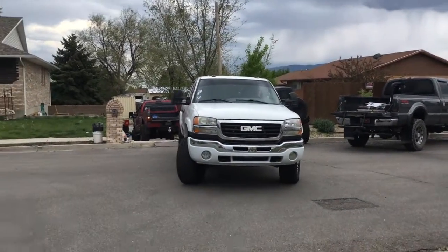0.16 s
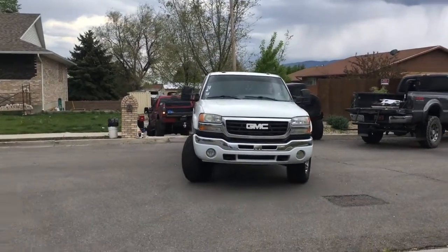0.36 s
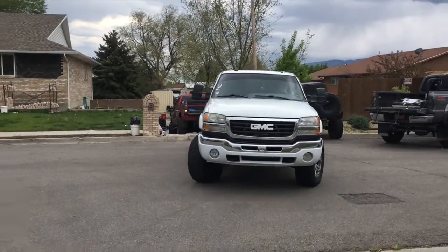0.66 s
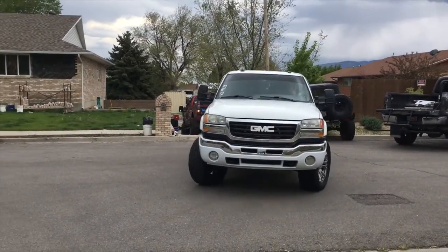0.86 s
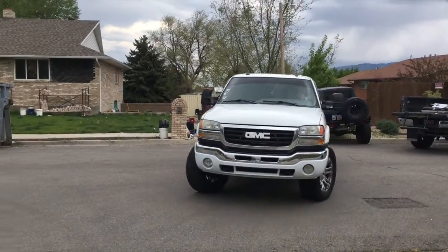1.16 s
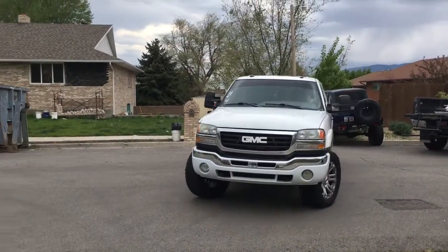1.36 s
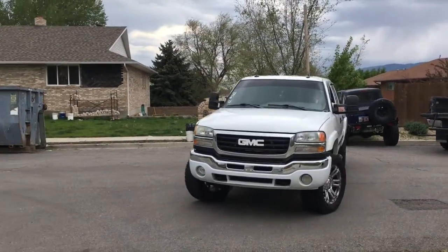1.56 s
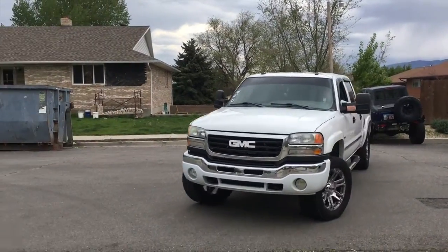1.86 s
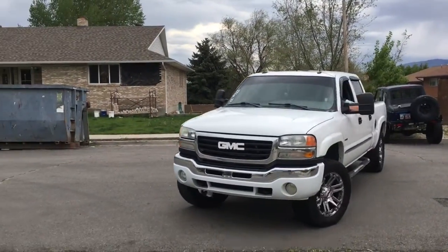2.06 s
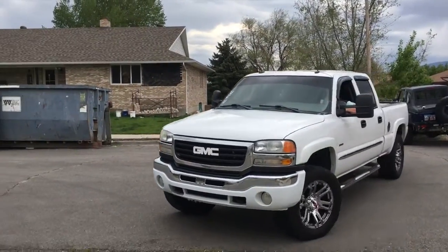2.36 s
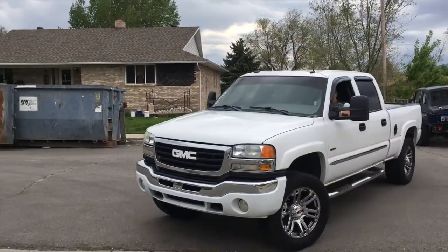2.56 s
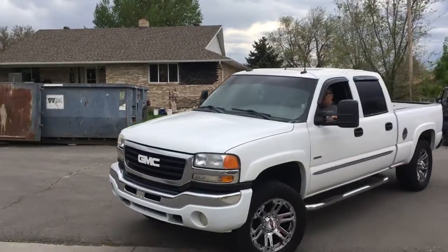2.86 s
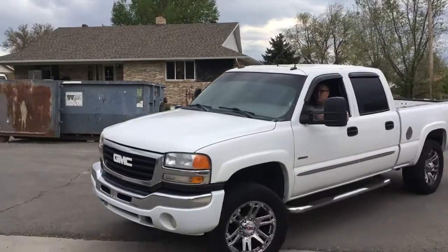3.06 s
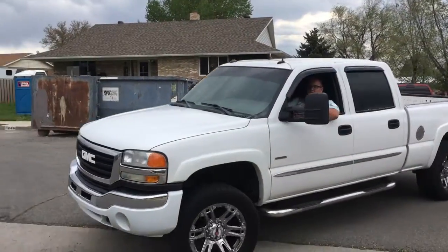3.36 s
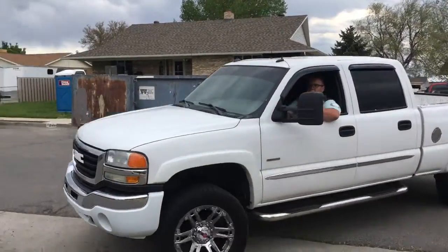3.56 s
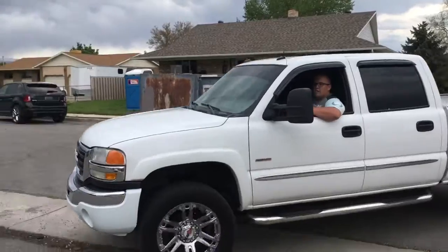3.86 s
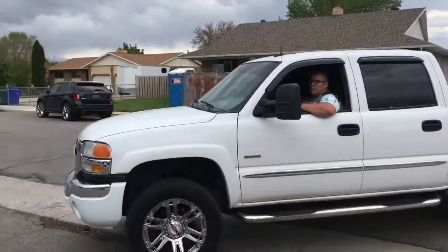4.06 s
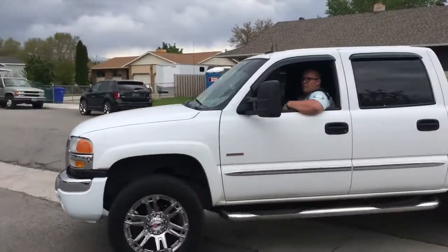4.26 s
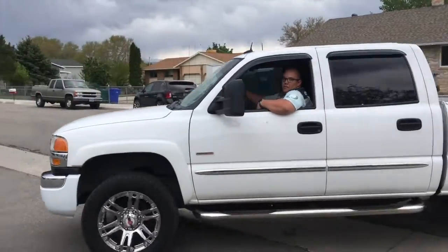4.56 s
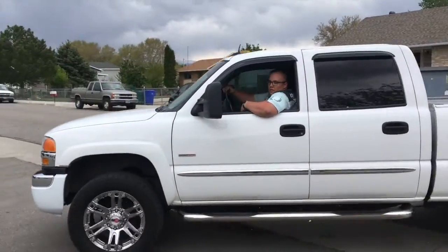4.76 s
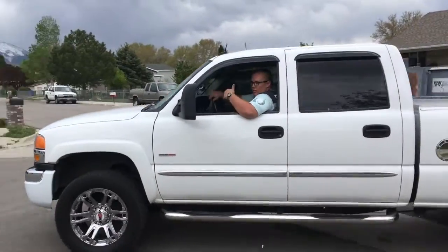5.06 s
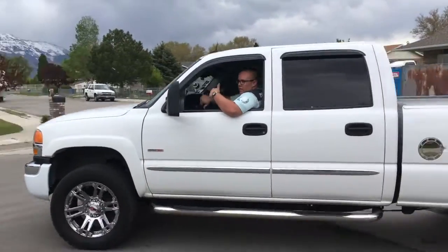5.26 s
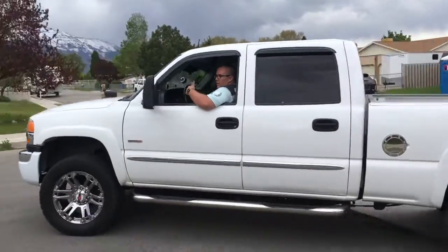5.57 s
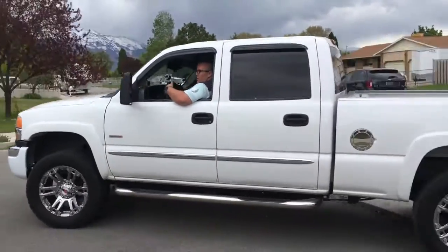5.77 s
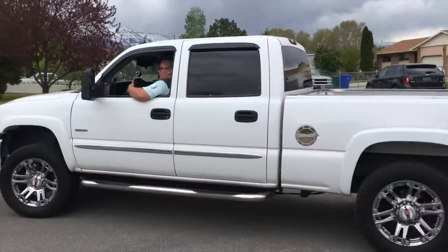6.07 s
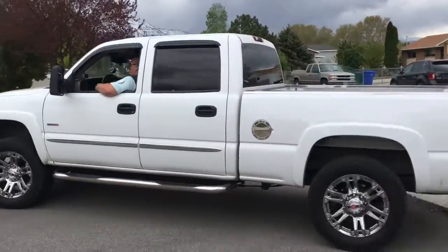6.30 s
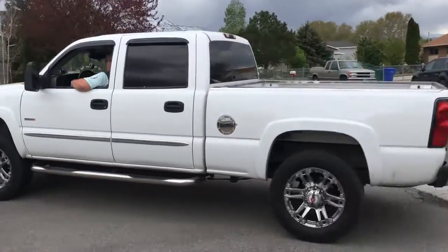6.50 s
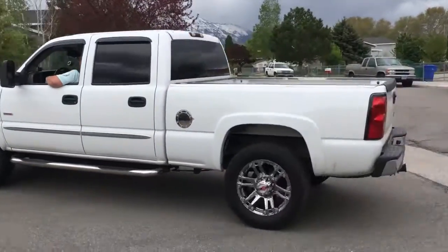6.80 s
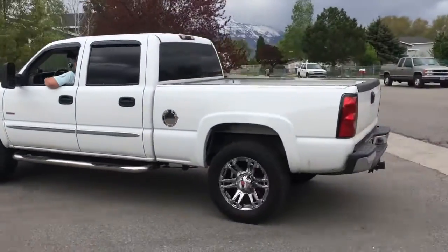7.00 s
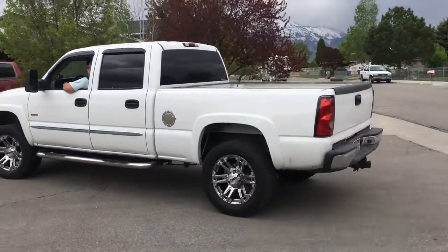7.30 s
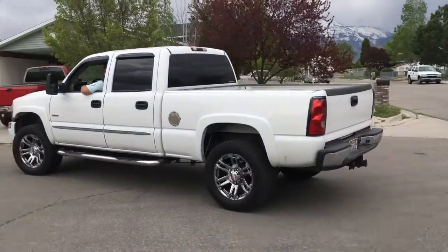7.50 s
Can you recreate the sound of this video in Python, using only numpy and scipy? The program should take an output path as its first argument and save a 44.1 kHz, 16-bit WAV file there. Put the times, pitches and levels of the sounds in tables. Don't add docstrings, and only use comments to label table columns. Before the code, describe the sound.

An open-air street, heard through a handheld microphone without wind protection. From 0 to 3 seconds, low rumbling wind and brief fluttery puffs dominate, with a cluster of rips around 1.4 to 1.9 and a heavy thump at 2.3. Beneath, a diesel pickup idles slowly closer with a quick, grainy clatter and thin hiss; faint grit ticks under its tyres. Between 3.2 and 3.8 the wind slams hardest. At about 4.1 the exhaust surges in a low boom, eases, then climbs in pitch and loudness as the truck pulls past. A dull, loud knock with a bright click lands at 4.76, a sharp stone snap at 5.5, and a smaller one at 6.1. The clatter is strongest around 5.7 to 6.5. From 6 to 7.6 the deep, throbbing exhaust drone stays full and loud, with wind still puffing, and the sound ends while it continues.

```python
import sys
import numpy as np
from scipy import signal
from scipy.fft import rfft, irfft, next_fast_len
from scipy.io import wavfile
from scipy.ndimage import uniform_filter1d, map_coordinates

SR = 44100
rng = np.random.default_rng(int(sys.argv[2]) if len(sys.argv) > 2 else 0)


def file_out(sig):
    cols = np.atleast_2d(sig).T
    lim = np.clip(cols, -1, 1)
    pcm = np.round(lim * 32767).astype(np.int16)
    wavfile.write(sys.argv[1], SR, pcm)


def magnitude_from_level(level_db):
    exponent = np.asarray(level_db, float) / 20
    return 10 ** exponent


N = 336924

# start_s, strength_db, edge_db (how far the microphone port's edge faces the wind)
WIND = [(0, -21, -10), (.57, -24.5, -11), (1.3, -22, -5.5), (1.47, -18, -4.5), (1.72, -21, -11),
        (1.86, -26, -21), (2.17, -30.5, -15), (2.4, -21.5, -5), (2.68, -25, -20), (3.04, -19.5, -26.5),
        (3.3, -26.5, -10.5), (3.96, -21.5, -24.5), (4.4, -22, -24.5), (5.06, -21, -18.5), (5.42, -19, -15),
        (6.02, -22.5, -9.5), (6.45, -21, -18), (7.64, -24, -19.5)]
# start_s, rip_db, thump_db, brightness_db, length_s
SLAMS = [(0.062, -25.5, -23, -15, 0.013), (0.267, -26, -20, -19, .011), (.735, -23.5, -12, -19, 0.017),
         (1.437, -21, -25, -17, 0.016), (1.474, -19, -16, -13, 0.035), (1.676, -19, -12.5, -40, .013),
         (1.83, -17, -15.5, -23, 0.013), (1.846, -16, -16, -33, 0.01), (2.281, -19, -2.5, -24, 0.024),
         (2.468, -11, -12.5, -22.5, .019), (3.193, -8.5, -5, -9.5, 0.011), (3.269, -9.5, -8.5, -6, .014),
         (3.388, -17, -12, -13, 0.02), (3.614, -18, -8, -8, 0.017), (3.728, -9.5, -8, -16.5, 0.011),
         (3.817, -30, -4.5, -18, 0.013), (4.166, -28.5, -11, -13, .016), (4.842, -18.5, -15, -25, 0.0085),
         (4.981, -18, -5, -10, 0.029), (5.189, -23.5, -11, -20, 0.014), (5.3, -26.5, -12, -15, 0.0075),
         (5.395, -27.5, -8.5, -15, 0.024), (5.956, -20, -11.5, -20, 0.015),
         (6.675, -18, -11.5, -3.5, 0.013)]


def unit(x):
    return x / np.sqrt(np.mean(x ** 2, -1, keepdims=True) + 1e-20)


def along(points, hz):
    f, v = np.transpose(points)
    return np.interp(np.log(hz + 1), np.log(f + 1), v)


def curves(rows):
    s, *columns = np.transpose(rows)
    return [np.interp(np.arange(N) / SR, s, column) for column in columns]


def wobble(rate):
    points = rng.standard_normal(int(N * rate / SR) + 4)
    return map_coordinates(points, [np.arange(N) * rate / SR])


def coloured(x, spectrum):
    size = x.shape[-1]
    m = next_fast_len(size + 8192)
    gain = magnitude_from_level(along(spectrum, np.fft.rfftfreq(m, 1 / SR)))
    return unit(irfft(rfft(x, m) * gain, m)[..., :size])


def patchy(patchy_db):
    z = signal.stft(rng.standard_normal(N + SR), nperseg=512)[2]
    field = uniform_filter1d(rng.standard_normal(z.shape), size=8, axis=0)
    field = uniform_filter1d(field, size=7, axis=1)
    return signal.istft(z * magnitude_from_level(patchy_db * field / field.std()), nperseg=512)[1][:N]


def place(rows, seconds):
    size = rows.shape[1]
    at = np.round(seconds * SR).astype(int)[:, None] + np.arange(size) + size // 2
    return np.bincount(at.ravel(), rows.ravel(), N + 3 * size)[size:N + size]


def wind():
    # pitch_hz, level_db per Hz
    rumble_colour = [(12, -43), (20, -78), (35, 2.5), (81, 2.5), (113, -1.5), (150, -4.5), (193, -7),
                     (253, -19), (300, -25), (390, -37), (660, -120)]
    flutter_colour = [(59, -32), (100, -4.5), (201, -5.5), (363, -11), (407, -12), (617, -25), (878, -32.5),
                      (1200, -37.5), (1560, -66), (2640, -120)]
    strength_db, edge_db = curves(WIND)
    s, _, thump_db = np.transpose(SLAMS)[:3]
    t = (np.arange(8192) - 4096) / SR
    width_s = np.where(t < 0, .0096, .022)
    swell = place(magnitude_from_level(thump_db - 10)[:, None] * np.exp(-.5 * (t / width_s) ** 2), s)
    unsteady = magnitude_from_level(1.8 * wobble(21) + 1.7 * wobble(7))
    rumble = unit(unsteady * coloured(rng.standard_normal(N), rumble_colour))
    flutter = unit(magnitude_from_level(4.0 * wobble(40)) * coloured(rng.standard_normal(N), flutter_colour))
    return (magnitude_from_level(strength_db) + swell) * rumble + magnitude_from_level(strength_db + edge_db + 1.0) * flutter


def bursts():
    # start_s, rip_db, brightness_db, pitch_hz
    small_rips = [(.004, -22, -11, 293), (.326, -21, -10, 330), (.406, -23.5, -17, 274),
                  (1.088, -23.5, -26, 273), (1.224, -22.5, -31, 330), (1.282, -22, -35, 370),
                  (1.394, -21.5, -32, 330), (1.511, -21, -29, 340), (1.578, -18.5, -36, 230),
                  (1.726, -21, -19, 265), (1.773, -16.5, -36, 260), (2.382, -20.5, -38, 292),
                  (2.499, -18.5, -34, 240), (2.86, -26.5, -16, 260), (3.412, -27, -22, 390),
                  (4.818, -24, -18, 325), (5.376, -33.5, 6.5, 386), (5.447, -18.5, -18, 250),
                  (5.545, -20, -12, 355), (5.611, -22, -19, 310), (5.805, -30.5, -1, 380),
                  (5.69, -30, -9, 312), (6.071, -28, -15, 389), (6.097, -22, -14, 292),
                  (6.133, -19.5, -11, 267), (5.932, -25.5, -9, 400), (7.158, -27, -25, 380),
                  (6.935, -24.5, -25, 330), (7.118, -21.5, -38, 385), (7.139, -28, -14, 400)]
    rip_thump_db = 4.5
    slams = [(s, db, thump, bright, length, 367 + 3.5 * bright) for s, db, thump, bright, length in SLAMS]
    rips = [(s, db, db + rip_thump_db, bright, .012, hz) for s, db, bright, hz in small_rips]
    count = 58
    luck = rng.standard_normal((count, 3))
    at = (np.arange(count) + .5 + .25 * luck[:, 0]) / count * N
    at = np.clip(at, 0, N - 1).astype(int)
    puff_db = sum(curves(WIND))[at] + 1 + 5.5 * np.tanh(luck[:, 1])
    puff_hz = 330 * np.exp(0.29 * luck[:, 2])
    puffs = [(i / SR, db, db + rip_thump_db, -18, .0065, hz) for i, db, hz in zip(at, puff_db, puff_hz)]
    return np.transpose(slams + rips + puffs)


def gusts():
    s, db, thump_db, bright_db, length, centre_hz = (c[:, None] for c in bursts())
    middle = 4096
    t = (np.arange(8192) - middle) / SR
    draw = rng.standard_normal((len(s), 3, len(t)))
    draw = draw + (t == 0) * 9 * np.sign(draw[:, :1, :1])
    shape = np.exp(-.5 * (t / (np.where(t < 0, .45, .52) * length)) ** 2)
    shape = shape + 0.12 * np.exp(-.5 * (t / 0.017) ** 2)

    def near(x):
        return x / np.sqrt(np.mean(x[:, middle - 300:middle + 300] ** 2, 1, keepdims=True))

    coarse_colour = [(90, -31), (150, 4.5), (280, -5.0), (400, -25), (800, -82)]
    fine_colour = [(200, -13), (320, 1), (550, -2.5), (750, -25.5), (1500, -78)]
    edge_colour = [(450, -8.5), (700, 3.0), (1100, -10), (1700, -22), (2300, -41), (3000, -55)]
    coarse = near(shape * coloured(draw[:, 0], coarse_colour))
    fine = near(shape * coloured(draw[:, 1], fine_colour))
    edge = near(shape * coloured(draw[:, 2], edge_colour))
    share = np.clip((centre_hz - 190) / 230, 0, 1)
    rip = (1.7 - 1.16 * share) * coarse + (0.12 + share) * fine
    push_hz = 80 * np.exp(0.22 * np.clip(draw[:, 0, :1], -1.5, 1.5))
    late = t - .009
    push = np.exp(-.5 * (late / 0.012) ** 2) * np.sin(2 * np.pi * push_hz * late + 3 * draw[:, 1, :1])
    strong = np.clip((db + 38.0) / 14, 0, 1)
    burst = magnitude_from_level(db - 2.5) * rip + magnitude_from_level(db + bright_db - 3.0) * edge
    return place(burst + strong * magnitude_from_level(thump_db - 3.0) * push, s[:, 0])


def grit():
    # start_s, peak_db
    stones = [(0.2892, -45), (0.631, -42), (2.6833, -32), (2.8983, -38), (2.9731, -41), (3.051, -38),
              (3.7983, -34), (4.0397, -38), (4.5261, -34), (5.0764, -28), (5.5318, -15), (5.9628, -37),
              (6.1275, -24), (6.3759, -31)]
    s, db = (c[:, None] for c in np.transpose(stones))
    t = (np.arange(2048) - 1024) / SR
    spray = (t > 0) * magnitude_from_level(-60 * np.abs(t) / .007) * rng.standard_normal((len(s), len(t)))
    crack = (t == 0) + .13 * spray
    snap = coloured(crack, [(2000, -45), (4000, -27), (9500, -17), (11500, -4), (14500, -1.0), (16000, -11)])
    return place(magnitude_from_level(db + 4.0) * snap / np.abs(snap).max(1, keepdims=True), s[:, 0] + 0.001)


def pings():
    # start_s, peak_db, pitch_hz, fade_s (time to fall 60 dB)
    knocks = [
        (.185, -44, 11700, 0.023),
        (.34, -42, 11800, .02),
        (3.69, -32, 1650, 0.035),
        (4.684, -27, 3300, .009),
        (4.759, -16, 710, 0.025),
        (4.76, -24, 3500, 0.0088),
        (5.521, -22, 6020, 0.0081),
    ]
    s, db, hz, t60 = (c[:, None] for c in np.transpose(knocks))
    t = np.maximum(np.arange(4096) - 2048, 0) / SR
    onset = 1 - np.exp(-t / 0.00097)
    return place(magnitude_from_level(db - 60 * t / t60) * onset * np.sin(2 * np.pi * hz * t), s[:, 0])


def block(firings):
    # start_s, level_db
    bay_level = [(0, -63), (1.19, -57.5), (1.68, -60.5), (2.17, -55.5), (2.64, -58.5), (3.04, -55.5),
                 (3.47, -57.5), (4.25, -53.5), (5.28, -52.5), (5.66, -50), (6.47, -51), (7.13, -55.5),
                 (7.64, -56.5)]
    # pitch_hz, level_db per Hz
    clatter_colour = [(150, -40), (250, -7), (380, -20.5), (550, -7), (800, -10.5), (1050, -13.5),
                      (1500, -15), (2100, -17), (2800, -18.5), (3000, -22.5), (3600, -22.5), (4600, -24.5),
                      (4950, -32.5), (5400, -59)]
    tick_colour = [(4500, -26), (5100, 2), (6100, 1), (6500, -2), (6800, 0.5), (7200, -3), (7800, -6.5),
                   (9400, -4.5), (10200, -7), (10700, -21)]
    hiss_colour = [(10100, -17), (10700, -3.5), (12100, 0.5), (13500, -0.5), (15000, 1), (15700, -3.5)]
    # pitch_hz, width_hz, boost_db
    panels = [(1265, 270, 4), (2523, 480, 3.5), (3140, 130, 2.5), (4160, 130, 1.5), (4570, 200, 2.5)]
    tick_db, = curves(bay_level)
    mean_db = tick_db.mean()
    clatter_db = mean_db + 11.5 + 0.71 * (tick_db - mean_db)
    hiss_db = mean_db + 0.87 * (tick_db - mean_db)
    count = firings.astype(int)
    cylinder = rng.standard_normal(8)[count % 8]
    chance = rng.standard_normal((3, count[-1] + 1))[:, count]
    decay = np.exp(-2.5 * (firings % 1))
    knock = magnitude_from_level(0.33 * cylinder + 3.3 * chance) * decay
    surge = wobble(26)
    hz = np.fft.rfftfreq(N, 1 / SR)
    ring = magnitude_from_level(sum(db / (1 + (2 * (hz - centre_hz) / width) ** 2) for centre_hz, width, db in panels))
    clatter = coloured((1 + 0.27 * knock[0]) * patchy(patchy_db=1.35), clatter_colour)
    clatter = unit(irfft(rfft(clatter) * ring, N))
    tick_swing = magnitude_from_level(1.12 * surge + 0.12 * wobble(5.1))
    tick = coloured((1 + 0.47 * knock[1]) * tick_swing * patchy(patchy_db=1.2), tick_colour)
    hiss_knock = 1 + 0.7 * magnitude_from_level(2.1 * chance[1]) * knock[2]
    hiss = coloured(hiss_knock * magnitude_from_level(0.74 * surge) * patchy(patchy_db=0.5), hiss_colour)
    return magnitude_from_level(clatter_db + 3.0) * clatter + magnitude_from_level(tick_db + 0.5) * tick + magnitude_from_level(hiss_db + 1.5) * hiss


def exhaust(firings, boom_db):
    # order (cycles per crankshaft turn), level_db under the boom
    shaft_orders = [(4, -10.5), (6, -23), (8, 0), (10, -24), (12, -20)]
    turns = firings / 4
    tone = 0
    for order, db in shaft_orders:
        waver = 1 - .1 * db
        phase = 2 * np.pi * (order * turns + rng.random()) + .17 * waver * wobble(12)
        tone = tone + magnitude_from_level(db + 1.1 * waver * wobble(9)) * np.sin(phase)
    throb = 1 + .32 * np.sin(2 * np.pi * turns + .7 * wobble(4))
    return np.sqrt(2) * magnitude_from_level(boom_db) * throb * tone


def scene():
    # start_s, firing_hz, boom_db
    engine = [(0, 45.04, -38), (.5, 45.6, -31), (1.1, 52.85, -31), (1.6, 48.6, -32.5), (2.6, 48.66, -32),
              (3.4, 48.5, -34), (3.9, 48.56, -37), (4.12, 53.52, -21), (4.45, 52.78, -28),
              (4.75, 55.36, -27.5), (5.05, 59.53, -24), (5.3, 61.58, -20), (5.53, 64.65, -23.5),
              (6.13, 67.12, -17.5), (6.57, 70.5, -16), (7, 69, -15.5), (7.36, 70.07, -14),
              (7.64, 68.4, -16.5)]
    firing_hz, boom_db = curves(engine)
    firings = np.cumsum(firing_hz) / SR
    truck = exhaust(firings, boom_db) + block(firings) + grit() + pings()
    return (truck + wind() + gusts())[None]


def band_limit(x):
    return signal.sosfilt(signal.butter(12, 16520, fs=SR, output="sos"), x)


def record(dry):
    m = next_fast_len(N + SR)
    hz = np.fft.rfftfreq(m, 1 / SR)
    margin = SR // 4
    wide = np.pad(dry, ((0, 0), (margin, margin)), "reflect")
    response = (hz < 15750) / np.sqrt(1 + (40 / (hz + 1)) ** 6)
    heard = irfft(rfft(wide, m) * response, m)[:, margin:margin + N]
    rounded = heard / (1 + np.abs(heard / .97) ** 6) ** (1 / 6)
    return band_limit(rounded)


dry = scene()
out = record(dry)
file_out(out)
```